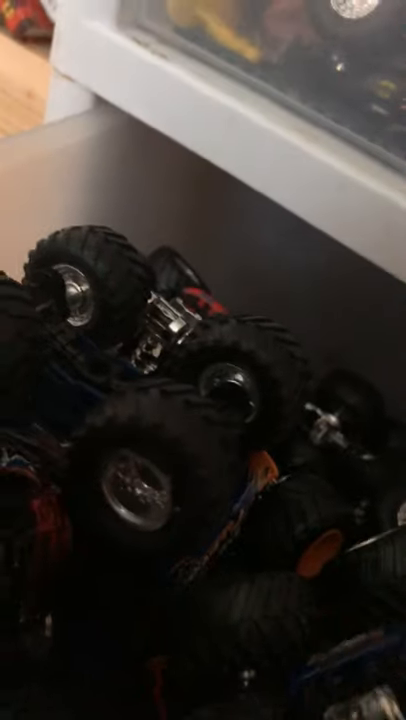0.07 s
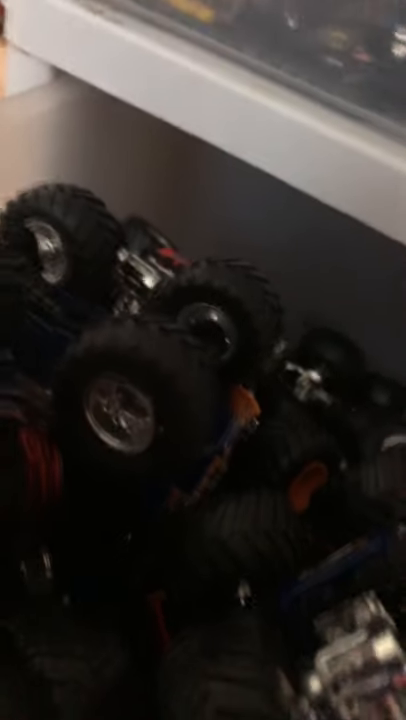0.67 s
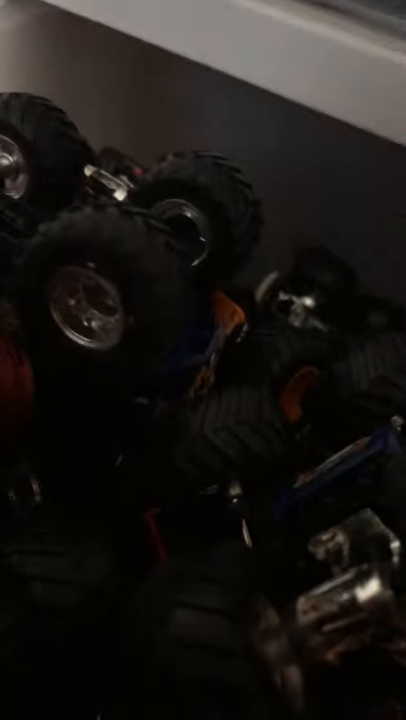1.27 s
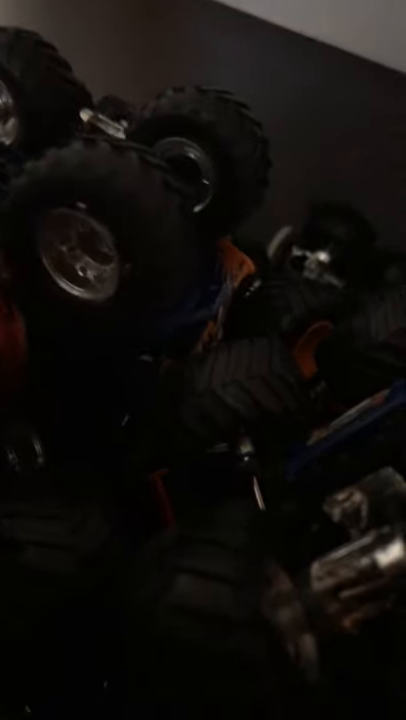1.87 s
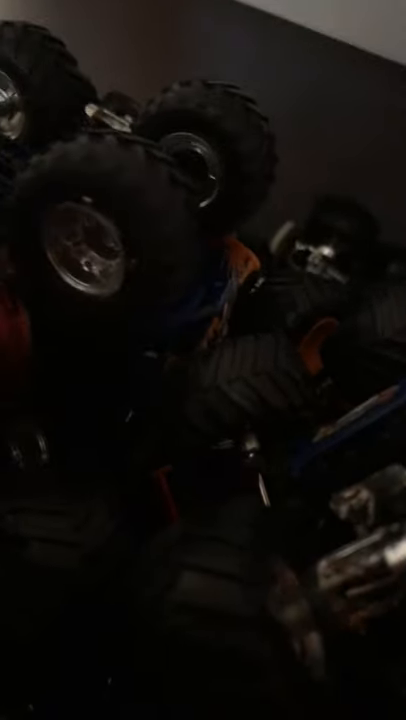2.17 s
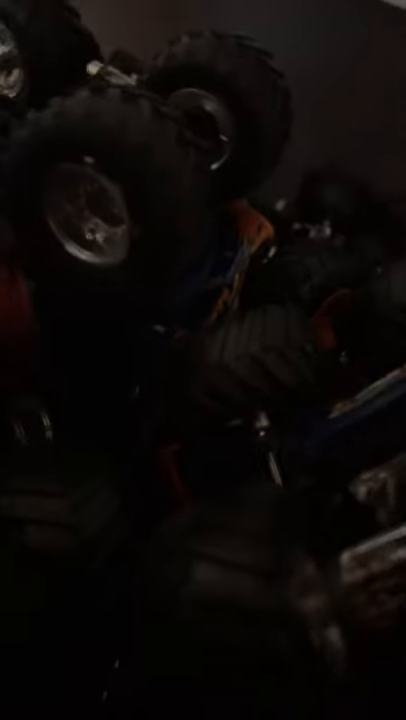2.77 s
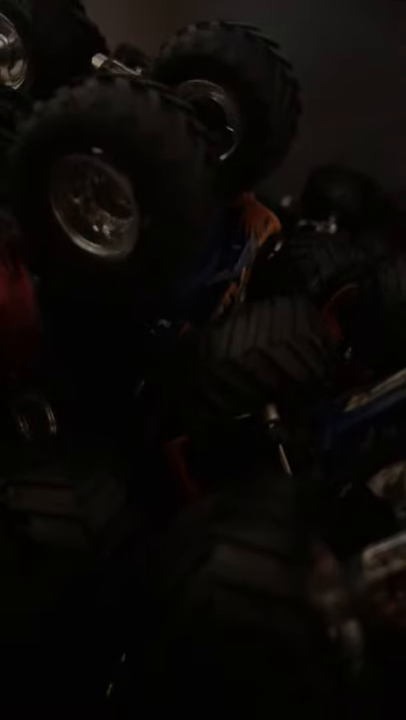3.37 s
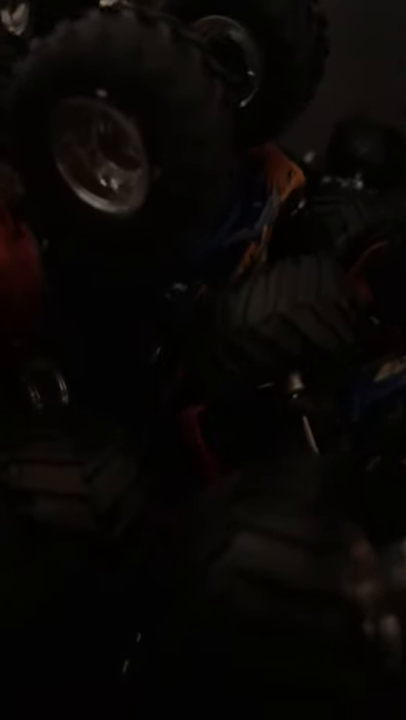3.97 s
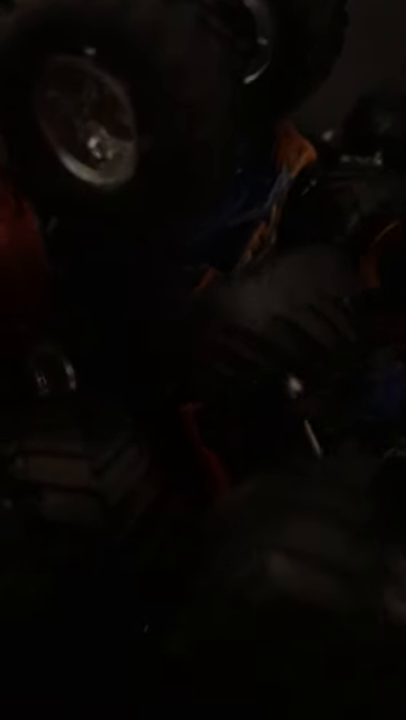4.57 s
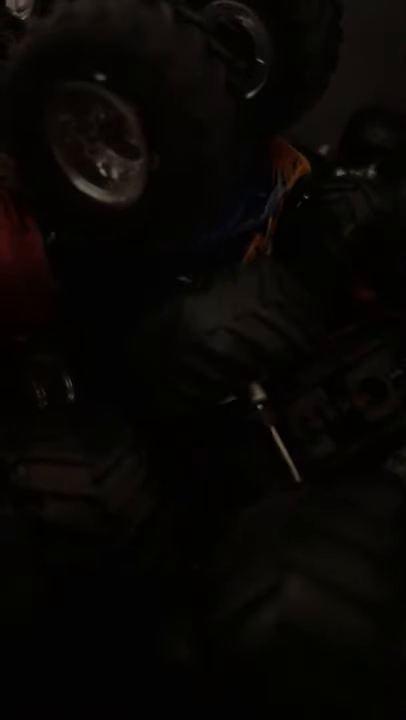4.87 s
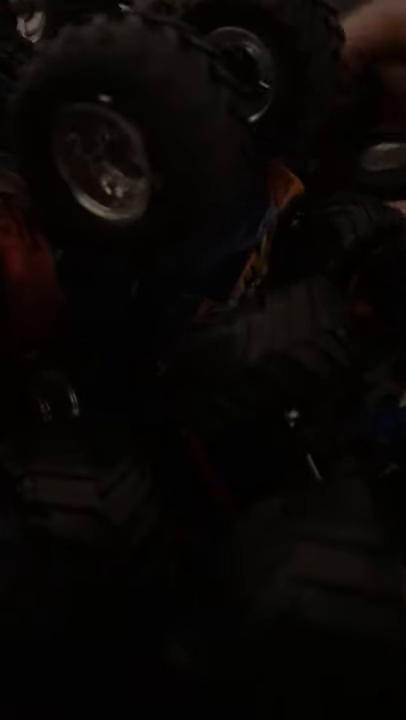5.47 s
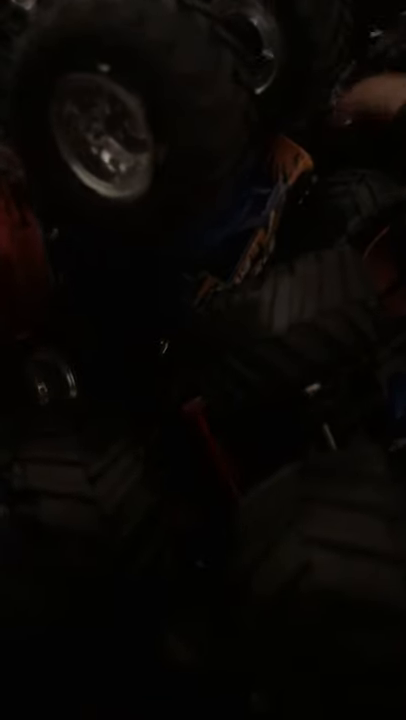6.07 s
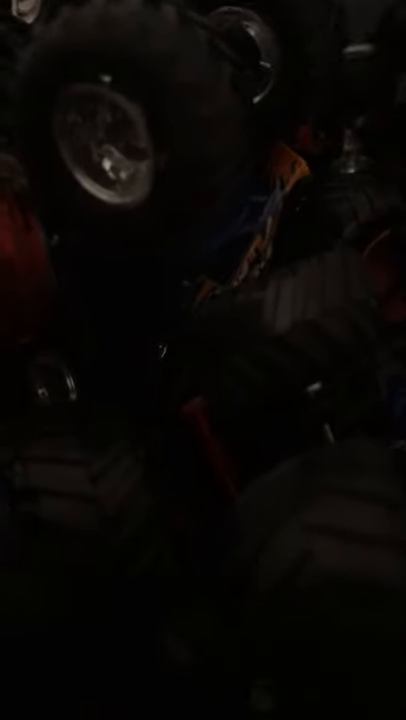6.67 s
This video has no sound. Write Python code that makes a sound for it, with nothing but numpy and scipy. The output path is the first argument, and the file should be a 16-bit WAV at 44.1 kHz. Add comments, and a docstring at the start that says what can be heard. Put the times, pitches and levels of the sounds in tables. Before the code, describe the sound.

Right at the start, a cabinet bangs once, close by, in a quick rattle of hard blows on thin panels. From about 0.6 seconds a hand rummages through toy trucks packed inside, lightly at first. Rubber tyres thud on the panels, plastic shells knock and click, and small metal parts give brief pings, while the shifting heap rubs, rustles and ticks underneath. The knocks are heaviest from about 1.5 to 4 seconds, with strong thumps near 1.6 and 2.6 seconds, a tumble around 2.9 and more knocks near 3.6 and 3.9. They then turn thinner and softer, with a few clacks between 5.2 and 5.8 seconds, before a last hard cluster at about 6.6 seconds. The hollow cabinet and the small room ring briefly behind the hits, over a faint low room tone.

```python
"""Close by in a small room, a cabinet bangs once, in a quick rattle of hard blows.
Then a hand rummages through the toy monster trucks packed inside: rubber tyres thud on the panels,
plastic shells knock and click, die-cast parts ping, and the heap rubs, rustles and ticks as it shifts.
The knocks are heaviest in the middle, thin out, and end on a last hard cluster.
The cabinet's hollow and the room ring on behind them, over a faint low room tone."""
import sys
import numpy as np
from scipy import signal
from scipy.fft import rfft, irfft
from scipy.io import wavfile
from scipy.ndimage import uniform_filter1d

SR = 44100
rng = np.random.default_rng(int(sys.argv[2]) if len(sys.argv) > 2 else 0)


def materialize(psi):
    """Save the field psi as 16-bit PCM at rate SR to the path in sys.argv[1].

    A 1-D psi becomes a single channel; in a 2-D psi each row is a channel.
    """
    bounded = np.clip(np.atleast_2d(psi).T, -1, 1)
    quanta = np.round(bounded * 32767).astype(np.int16)
    wavfile.write(sys.argv[1], SR, quanta)


N = 296352

# tone colour of plastic contacts: (frequency [Hz], level [dB])
PLASTIC = [(400, -4), (1000, 0), (1500, -4.5), (2300, -0.5), (3200, -5), (5000, -12), (6500, -17.5),
           (10000, -21.5), (16000, -26.5)]
# the hand shoves the heap, or the heap settles:
# (time [s], length [s], force [dB], rubbing [dB re force], scratching [dB re force])
SHOVES = [(0.0, 0.069, -31.5, -1, -8.5), (0.749, 0.077, -40, -13.5, -6.5),
          (1.06, 0.41, -38.5, -12.5, -23.5), (1.33, 0.071, -34.5, 2.5, -6.5), (1.561, .23, -33, -6.5, -20),
          (2.02, 0.45, -33, -6.5, -23), (2.301, 0.54, -36, -2, -17.5), (2.89, 0.17, -24.5, -9.5, -23.5),
          (3.122, 0.15, -36.5, -12.5, -42), (3.53, 0.024, -39, -15, -30), (3.65, 0.084, -27, -15, -30.5),
          (3.868, 0.22, -32.5, -8, -15), (4.27, 0.21, -41, -9.5, -22.5), (4.549, 0.078, -39, -10, -16),
          (4.78, 0.13, -41, -12.5, -17), (5.101, 0.14, -38.5, -11.5, -12.5), (5.289, .21, -30.5, -11, -15),
          (5.532, 0.11, -36, -14, -24), (5.74, 0.2, -35.5, -15.5, -22.5), (6.109, 0.14, -35.5, -10.5, -19),
          (6.438, 0.11, -41, -10, -13.5), (6.571, 0.035, -29.5, -6.5, -16), (6.70, .02, -30.5, -11, -20)]

THUD_TOP_HZ, KNOCK_TOP_HZ, CLACK_TOP_HZ, RUB_TOP_HZ = 429, 1400, 4720, 2920
TYRE_SETTLE_T60_S, SLIDE_SETTLE_T60_S = 0.51, 0.44   # tyres wobble on longer than shells slide
RUMBLE_STIR_DB, RUB_STIR_DB, SCRATCH_STIR_DB = -55.5, -76.5, -83.5   # the heap never quite rests
AGE = np.arange(6000) / SR   # seconds since a hit


def trucks():
    """Trucks hit each other and the panels; die-cast parts ping in close pairs of modes that beat."""
    # hits in the heap: (time [s], thud level [dB], shell level [dB], hardness [dB per octave])
    contacts = [(0.251, -62, -62, 9.5), (0.587, -41, -61, 0), (0.699, -35, -38.5, 3.5),
                (0.807, -43, -40, 2), (0.828, -36, -44.5, 0.5), (0.945, -37.5, -47, 1.5),
                (1.02, -37.5, -47, -2.5), (1.094, -32.5, -46.5, 2), (1.132, -43, -47, 0),
                (1.226, -33.5, -41, -5.5), (1.274, -58, -47.5, 6.5), (1.316, -31.5, -37.5, -3.5),
                (1.379, -27, -29.5, 0.5), (1.457, -37, -45, 4), (1.518, -31, -37, -3),
                (1.574, -26.5, -28.5, -3.5), (1.6105, -13, -28, -4), (1.682, -21.5, -23.5, -0.5),
                (1.789, -53, -33.5, -2.5), (1.806, -29.5, -50, -3), (1.889, -35, -41, -1.5),
                (1.97, -22, -69, -15), (1.997, -39, -44.5, -3.5), (2.17, -30, -33.5, -4),
                (2.316, -21.5, -34, -4), (2.335, -26, -36.5, -5), (2.428, -27.5, -52, -12.5),
                (2.459, -31, -47, -12), (2.501, -29, -44.5, 2.5), (2.534, -20, -36, -2.5),
                (2.641, -8.5, -25, -3.5), (2.8, -30, -38.5, -1), (2.818, -22.5, -34.5, -5),
                (2.87, -17.5, -31.5, -5.5), (2.902, -15, -31, -5), (2.914, -19.5, -33, -3.5),
                (2.925, -20.5, -30, -6.5), (3.005, -29, -43, 7.5), (3.093, -22, -44.5, -6),
                (3.22, -31.5, -45, -4.5), (3.345, -39, -65, 3.5), (3.476, -39.5, -62.5, 0.5),
                (3.598, -16, -33, -2), (3.697, -21, -36, -3.5), (3.889, -29.5, -40, 4),
                (3.932, -17, -28.5, -1), (4.018, -23.5, -27.5, -2), (4.045, -32, -41.5, 4),
                (4.261, -30.5, -42, 0.5), (4.297, -29, -53, -0.5), (4.369, -48, -68, 5),
                (4.635, -28.5, -47.5, -7.5), (4.771, -62, -50.5, -0.5), (4.889, -35.5, -46, 0.5),
                (4.944, -59, -53.5, 0.5), (5.113, -39, -39.5, 1), (5.224, -27.5, -41.5, 1.5),
                (5.277, -42, -41, 2), (5.342, -29, -39, 4), (5.456, -25.5, -32, 2),
                (5.694, -26, -40.5, -6.5), (5.771, -24, -48, -7.5), (5.888, -32, -57, -8.5),
                (6.417, -38, -49.5, 1.5), (6.508, -38, -51, 6.5), (6.574, -23, -30.5, 2.5),
                (6.59, -29.5, -32, 2.5), (6.601, -13.5, -35.5, 5.5)]
    # parts that ring on when struck: (time [s], pitch [Hz], level [dB], t60 [s])
    pings = [(1.255, 2210, -19, 0.014), (1.315, 5050, -16.5, 0.033), (1.316, 5900, -35, 0.067),
             (1.316, 2170, -31, 0.13), (1.58, 2345, -25, 0.068), (1.682, 2430, -32, 0.22),
             (1.683, 2230, -9.5, 0.021), (1.685, 4050, -45, 0.27), (2.169, 4710, -26, 0.034),
             (2.642, 4220, -41, 0.045), (2.822, 5200, -44, 0.068), (3.888, 1053, -9, 0.017),
             (3.889, 1520, -7, 0.008), (4.454, 922, -22, 0.026), (5.112, 2710, -25, 0.015),
             (5.456, 2390, -31.5, 0.077), (5.696, 920, -20.5, 0.021), (6.547, 924, -17.5, 0.025)]
    shell = shells(len(contacts), bite_s=.0035, crack_t60=.024,
                   rattle_db=-18, rattle_t60=.11, ring_db=-1, ring_t60=.018)
    out = blows(contacts, shell, thud_db=-0.5, knock_db=-3.0, clack_db=-1.46, tick_db=-5.0)
    attack = 1 - np.exp(-AGE / 0.0005)
    for s, hz, db, t60 in pings:
        pair = ring(hz, t60) - .4 * ring(hz * rng.uniform(1.02, 1.06), t60)
        add(out, s, from_db(db) * pair * attack)
    return out


def cabinet_bang():
    """A quick rattle of hard blows, with the bright rap of thin panels."""
    # hits within the bang: (time [s], thud level [dB], shell level [dB], hardness [dB per octave])
    hits = [(0.024, -29, -19.5, 0), (0.035, -18.5, -18.5, -1), (0.046, -23, -18, 3.5),
            (0.055, -22, -9.5, 1.5), (0.061, -26, -13.5, -2.5)]
    shell = shells(len(hits), bite_s=.0008, crack_t60=.025,
                   rattle_db=-17, rattle_t60=.12, ring_db=-18, ring_t60=.01)
    rap = from_db(7) * band(shell, [1700, 2800], "band")
    return blows(hits, shell + rap, thud_db=2.5, knock_db=-2.0, clack_db=-1.0, tick_db=-19.5)


def blows(hits, shell, thud_db, knock_db, clack_db, tick_db, tyre_lag_s=.001):
    """The shell sounds first, brighter for a harder hit; soft tyres thump the panels a moment later."""
    # cabinet panel modes: (pitch [Hz], level [dB], t60 [s])
    panel_modes = [(72, -23, .2), (108, -11.5, 0.16), (139, -7, 0.17), (168.7, -2, 0.077),
                   (207.5, 1, 0.087), (239.7, -1.5, 0.11), (278.2, 0.5, .055), (362.5, -6.5, 0.072),
                   (397.3, -8, 0.092)]
    times, thud, clack, hardness = np.transpose(hits)
    tilt_db = 1.75 * hardness   # knock, clack and tick lie 1.75 octaves apart
    knock, tick = clack - tilt_db, clack + tilt_db
    panels = np.array([from_db(db) * ring(hz, t60) for hz, db, t60 in panel_modes])
    # where a blow lands sets the sign and strength of each panel mode
    shape = (len(times), len(panel_modes))
    strengths = rng.uniform(.5, 1, shape) * np.sign(rng.random(shape) - .25)
    thumps = at_level(band(strengths @ panels, [75, THUD_TOP_HZ], "band"), thud + thud_db, size=440)
    knocks = at_level(band(shell, [THUD_TOP_HZ, KNOCK_TOP_HZ], "band", order=3), knock + knock_db)
    clacks = at_level(band(shell, [KNOCK_TOP_HZ, CLACK_TOP_HZ], "band", order=3), clack + clack_db)
    ticks = at_level(band(shell, CLACK_TOP_HZ, "high", order=4), tick + tick_db)
    out = np.zeros(N)
    for s, contact, thump in zip(times, knocks + clacks + ticks, thumps):
        add(out, s - tyre_lag_s / 2, contact)
        add(out, s + tyre_lag_s / 2, thump)
    return out


def shells(count, bite_s, crack_t60, rattle_db, rattle_t60, ring_db, ring_t60):
    """Each contact bites within milliseconds, sets a shell ringing and rattles its loose neighbours."""
    shape = (count, len(AGE))
    crack = rng.standard_normal(shape) * (1 - np.exp(-AGE / bite_s)) * fade(crack_t60)
    rattle = rms_one(rng.standard_normal(shape) * (rng.random(shape) < 400 / SR))   # 400 clicks a second
    force = crack + from_db(rattle_db) * rattle * fade(rattle_t60)
    bodies = np.array([shell_ring(ring_t60) for _ in range(count)])
    ringing = signal.fftconvolve(force, bodies, axes=1)[:, :len(AGE)]
    return colour(force + from_db(ring_db) * ringing, PLASTIC)


def shell_ring(t60, count=28, size=1500):
    """A toy's hollow shell: well damped modes at pitches of its own; unit energy."""
    pitches = np.geomspace(450, 14000, count) * 2 ** rng.uniform(-1 / 8, 1 / 8, count)
    modes = np.sin(2 * np.pi * np.outer(pitches, AGE[:size]))
    body = rng.standard_normal(count) @ modes * fade(t60, AGE[:size])
    return body / np.linalg.norm(body)


def shifting(rumble_db, rub_db, scratch_db):
    """Treads stumble over each other, shells jostle and edges scratch in clumps of tiny slips."""
    # tone colour of rubbing: (frequency [Hz], level [dB])
    friction = [(30, -43.5), (70, -1.5), (120, 3), (210, 3), (320, -2.5), (470, -15), (650, -13.5),
                (950, -15.5), (1500, -19.5), (3000, -25.5), (5000, -26.5), (7000, -36), (16000, -47.5)]
    _, _, force, rubbing, scratching = np.transpose(SHOVES)
    rumble = motion(force, TYRE_SETTLE_T60_S, RUMBLE_STIR_DB)
    rub = motion(force + rubbing, SLIDE_SETTLE_T60_S, RUB_STIR_DB)
    scratch = motion(force + scratching, SLIDE_SETTLE_T60_S, SCRATCH_STIR_DB)
    stumbles = colour(grains(per_s=350, spread_db=1.0), friction)
    scrapes = grains(per_s=2200, spread_db=3.3) * stick_slip(depth_db=4.0)
    slips = colour(jostle(per_s=170, spread_db=3.0, t60=0.028) + from_db(-1.5) * scrapes, friction)
    return (from_db(rumble_db) * rumble * rms_one(band(stumbles, THUD_TOP_HZ, "low", order=4))
            + from_db(rub_db) * rub * rms_one(band(slips, [THUD_TOP_HZ, RUB_TOP_HZ], "band", order=3))
            + from_db(scratch_db) * scratch * rms_one(band(slips, RUB_TOP_HZ, "high", order=3)))


def motion(levels_db, settle_t60, stir_db, rise_s=0.076):
    """How fast the heap moves: each shove rises, holds and settles, and the strongest one leads."""
    t, speed = np.arange(N) / SR, from_db(stir_db)
    for (start, length, *_), db in zip(SHOVES, levels_db):
        rise = np.clip(1 + (t - start) / rise_s, 0, 1)
        settle = fade(settle_t60, np.maximum(t - start - length, 0))
        speed = np.maximum(speed, from_db(db) * rise * settle)
    return speed


def jostle(per_s, spread_db, t60, count=80):
    """Small knocks at random moments, each on one of many toys; unit power."""
    toys = [shell_ring(t60) for _ in range(count)]
    knocks, out = grains(per_s, spread_db), np.zeros(N)
    for at in np.flatnonzero(knocks):
        add(out, at / SR, knocks[at] * toys[at % count])
    return rms_one(out)


def stick_slip(depth_db, per_s=45):
    """A gain that surges and stalls as surfaces catch and let go."""
    turns_s = np.cumsum(rng.exponential(1 / per_s, 1000))
    surge = np.interp(np.arange(N) / SR, turns_s, rng.standard_normal(len(turns_s)))
    return rms_one(from_db(depth_db * surge))


def grains(per_s, spread_db):
    """Random tiny slips of uneven size; unit power."""
    slipping = rng.random(N) < per_s / SR
    sizes = np.minimum(-np.log(1 - rng.random(N)), 4)   # many small, a few large
    signs = np.sign(rng.random(N) - .5)
    return rms_one(slipping * from_db(spread_db * sizes) * signs)


def loose_parts(level_db=-55.5, tick_t60=0.012, low_hz=2200):
    """Axles and trim give dry, uneven ticks at random; even a gentle shove tips them over."""
    _, _, force, _, scratching = np.transpose(SHOVES)
    speed = motion(force + scratching, SLIDE_SETTLE_T60_S, SCRATCH_STIR_DB)
    swell = (speed / speed.max()) ** .65   # the ticks swing less widely than the scratching
    tick = rng.standard_normal(len(AGE)) * fade(tick_t60)
    ticks = signal.oaconvolve(grains(per_s=45, spread_db=1.0), tick)[:N]
    return from_db(level_db) * swell * rms_one(band(colour(ticks, PLASTIC), low_hz, "high"))


def room(x, hollow_db, build_s=0.0063):
    """The cabinet's hollow rings and the room answers with a diffuse tail."""
    # modes of the cabinet's hollow: (pitch [Hz], level [dB], t60 [s])
    hollow_modes = [(388, 0, .2), (587, -4, .22), (659, -2, .26), (884, -2, .3), (1068, -4, .36),
                    (1398, -7, .36), (1850, -6, .27), (2162, -1, .27), (2377, -2, .27), (2615, -5, .3),
                    (2790, -5, .25), (5091, -8, .17)]
    # the room's decay: (frequency [Hz], t60 [s])
    decay = [(100, 0.24), (500, 0.48), (2000, 0.41), (6000, 0.32), (14000, 0.37)]
    age = np.arange(SR // 2) / SR
    edges_hz = np.geomspace(80, 18000, 9)
    tail = np.zeros(len(age))
    for lo, hi in zip(edges_hz, edges_hz[1:]):
        wash = band(rng.standard_normal(len(age)), [lo, hi], "band")
        tail += wash * fade(at_hz(decay, np.sqrt(lo * hi)), age)
    tail = rms_one(tail * (1 - np.exp(-age / build_s)))
    hollow = sum(from_db(db) * ring(hz, t60, age) for hz, db, t60 in hollow_modes)
    response = tail + from_db(hollow_db) * rms_one(hollow)
    return signal.oaconvolve(x, response / np.sqrt(len(response)))[:N]


def room_tone(level_db=-53):
    """The still room: a low rumble under a faint hiss."""
    # tone colour of the air: (frequency [Hz], level [dB])
    air = [(15, -80), (25, -48), (58, -3.5), (80, 5), (102, -34.5), (217, -12.5), (326, -44), (394, -30.5),
           (607, -40), (16000, -54.5)]
    return from_db(level_db) * rms_one(colour(rng.standard_normal(N), air))


def from_db(db):
    """Decibels to gain."""
    return 10 ** (np.asarray(db) / 20)


def rms_one(x):
    """Scale to unit power."""
    return x / np.sqrt(np.mean(x ** 2) + 1e-20)


def at_level(sounds, db, size=220):
    """Set the level of each row's loudest stretch of `size` samples."""
    power = uniform_filter1d(sounds ** 2, size, axis=1, mode="constant").max(axis=1)
    return sounds * (from_db(db) / np.sqrt(power))[:, None]


def at_hz(points, hz):
    """Read a table on a log-frequency axis."""
    f, value = np.transpose(points)
    return np.interp(np.log(np.maximum(hz, 1)), np.log(f), value)


def band(x, hz, kind, order=2):
    """Causal Butterworth filter."""
    return signal.sosfilt(signal.butter(order, hz, kind, fs=SR, output="sos"), x + 1e-18)


def colour(x, spectrum, size=4096):
    """Minimum-phase EQ, so that nothing sounds ahead of a hit."""
    gains = from_db(at_hz(spectrum, np.arange(size // 2 + 1) * SR / size))
    cepstrum = irfft(np.log(gains))
    cepstrum[1:size // 2] *= 2
    cepstrum[size // 2 + 1:] = 0
    response = np.array(irfft(np.exp(rfft(cepstrum))), ndmin=x.ndim)
    return signal.oaconvolve(x, response, axes=-1)[..., :x.shape[-1]]


def fade(t60, age=AGE):
    """Exponential decay, 60 dB down after t60 seconds."""
    return np.exp(-np.log(1000) * age / t60)


def ring(hz, t60, age=AGE):
    """One struck mode."""
    return np.sin(2 * np.pi * hz * age) * fade(t60, age)


def add(track, s, sound):
    """Mix a sound in at time s."""
    at = max(round(s * SR), 0)
    track[at:at + len(sound)] += sound[:max(N - at, 0)]


def scene():
    """The bang and the toys sit up front, with a light reverb send and room tone beneath."""
    bang = cabinet_bang()
    toys = trucks() + shifting(rumble_db=-3.0, rub_db=-1.5, scratch_db=-0.5) + loose_parts()
    air = room_tone()
    wet = room(from_db(-12.5) * bang + from_db(-13.0) * toys, hollow_db=-20.5)
    return (bang + toys + wet + air)[None]


def record(dry, low_cut_hz=35, high_cut_hz=16200):
    """Peaks are rounded, the deepest bass and the top are cut."""
    rounded = band(1.235 * np.tanh(dry / 1.183), low_cut_hz, "high")
    return signal.sosfilt(signal.ellip(10, .1, 80, high_cut_hz, fs=SR, output="sos"), rounded)


dry = scene()
out = record(dry)
materialize(out)
```